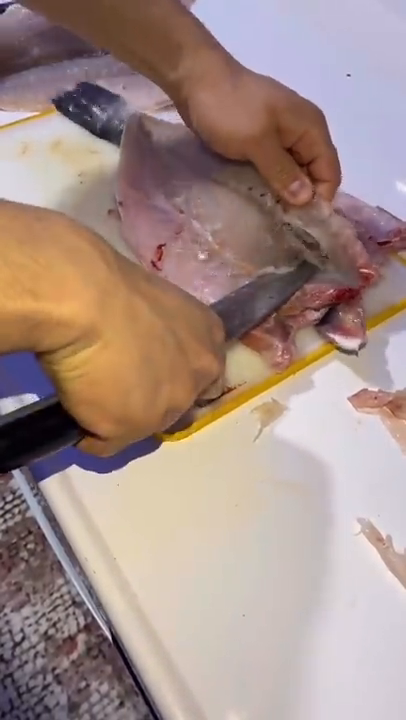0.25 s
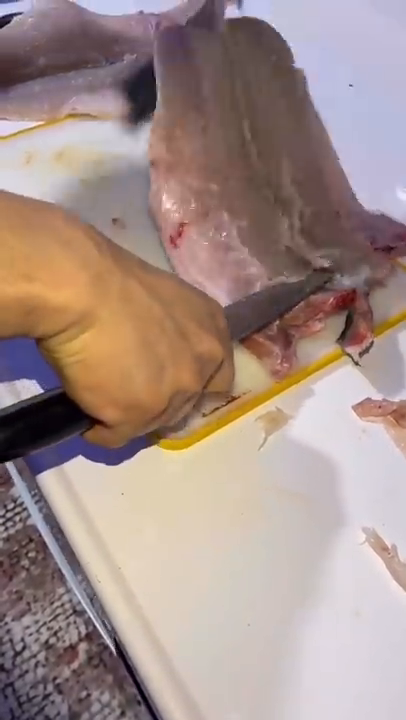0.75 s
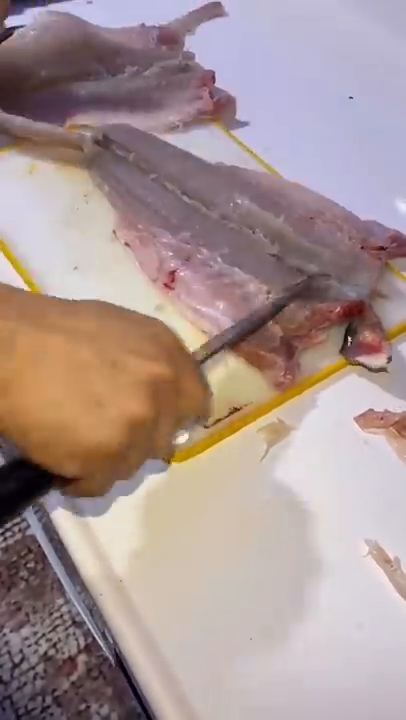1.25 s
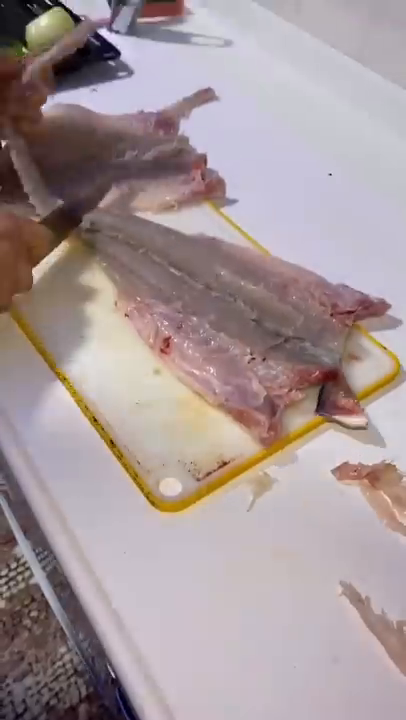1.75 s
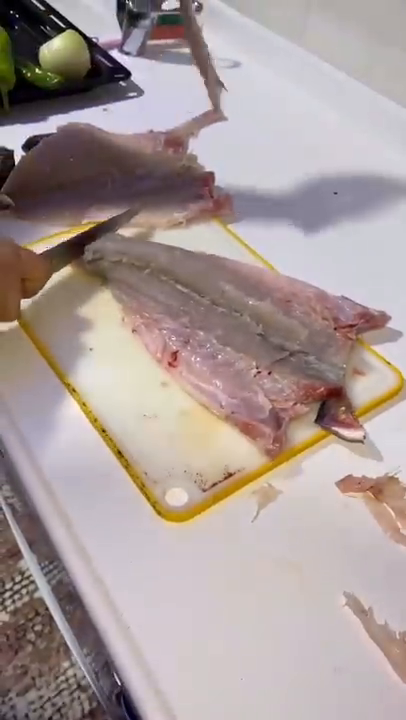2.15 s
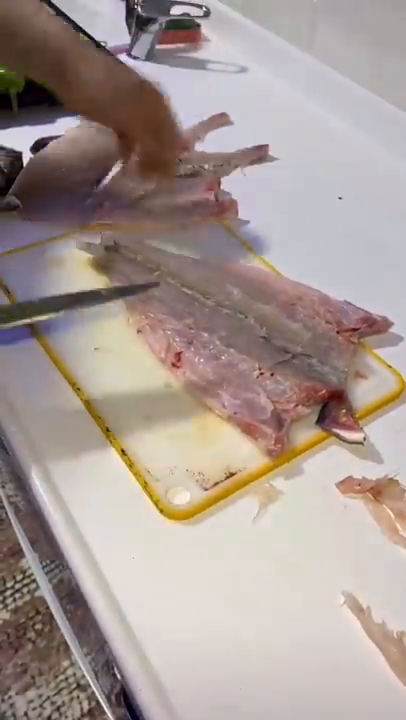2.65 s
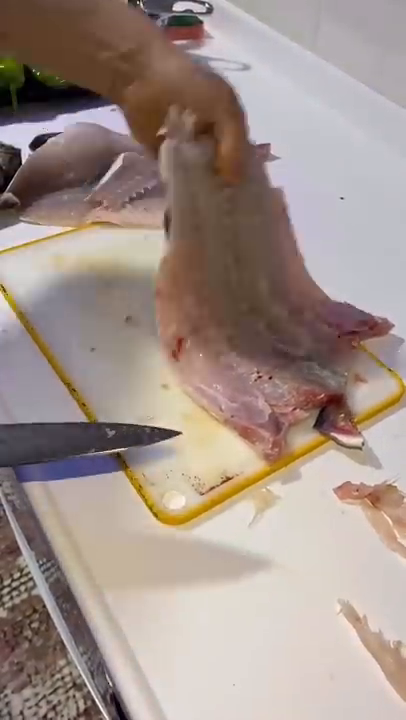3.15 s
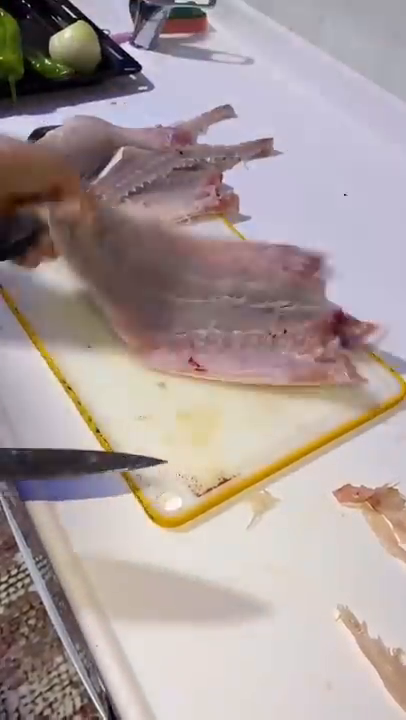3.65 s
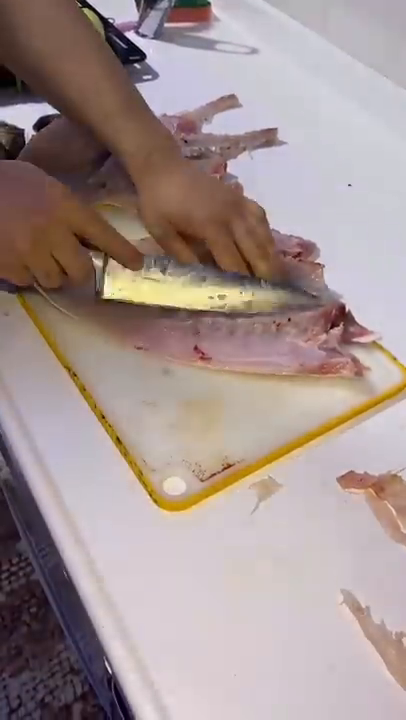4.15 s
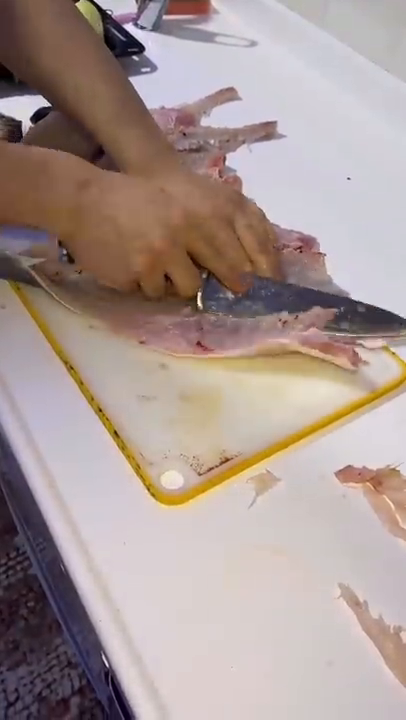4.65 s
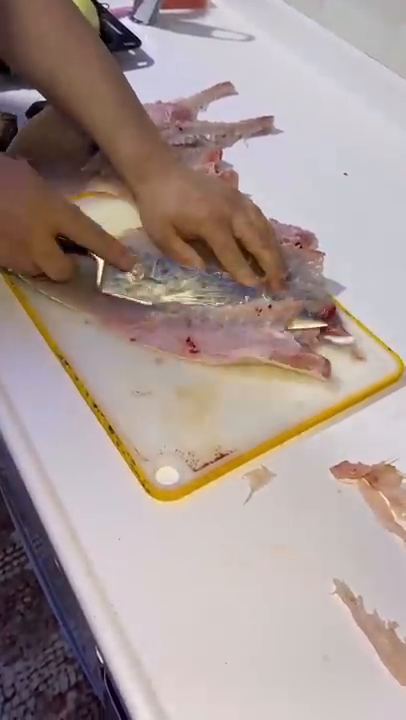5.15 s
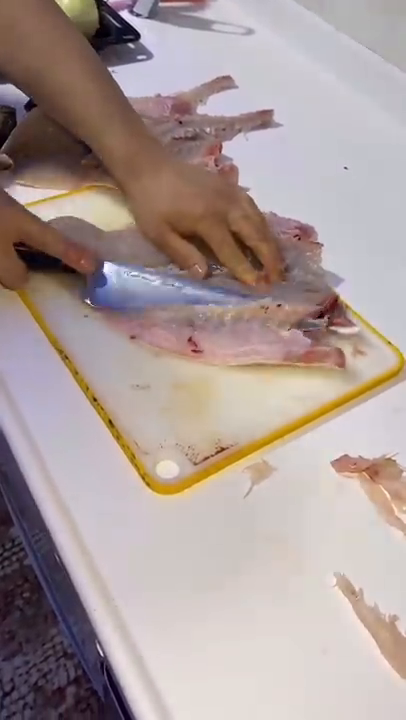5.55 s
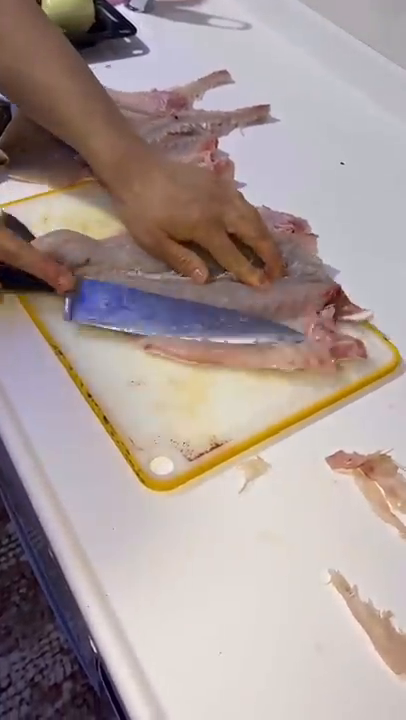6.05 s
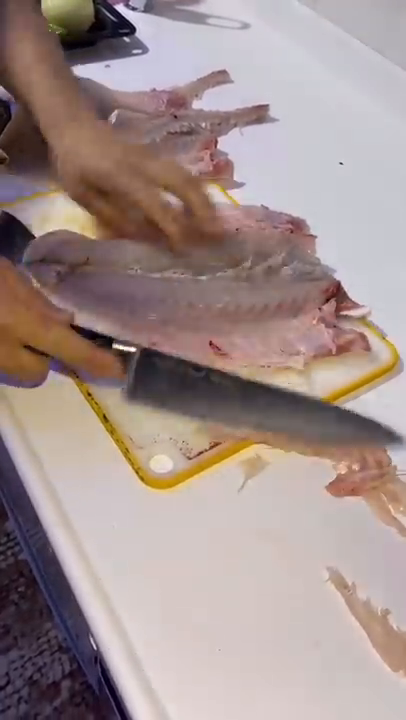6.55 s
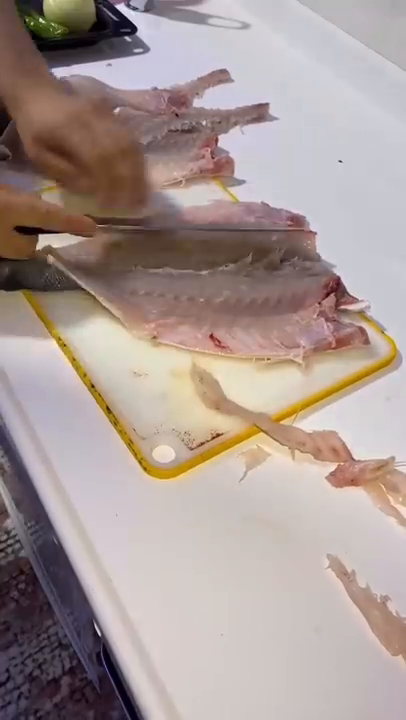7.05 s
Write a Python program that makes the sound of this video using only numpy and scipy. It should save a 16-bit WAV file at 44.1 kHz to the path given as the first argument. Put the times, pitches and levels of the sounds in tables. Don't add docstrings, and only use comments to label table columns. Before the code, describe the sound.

Close squelchy pulls, ticks and taps of a knife on a board, one loud thud, then quieter slicing strokes in a tiled kitchen.

```python
import sys
import numpy as np
from scipy import signal
from scipy.fft import rfft, irfft, next_fast_len
from scipy.io import wavfile
from scipy.ndimage import uniform_filter1d, map_coordinates

SR = 44100
rng = np.random.default_rng(int(sys.argv[2]) if len(sys.argv) > 2 else 0)


def magnitude_from_level(level_db):
    exponent = np.asarray(level_db, float) / 20
    return 10 ** exponent


def file_out(sig):
    cols = np.atleast_2d(sig).T
    lim = np.clip(cols, -1, 1)
    pcm = np.round(lim * 32767).astype(np.int16)
    wavfile.write(sys.argv[1], SR, pcm)


N = 322350
CUT_S = 3.588

# frequency in Hz, density in dB per Hz.
FIZZ = [(4000, -25), (6500, 1.5), (10000, 2.5), (15500, -2), (16200, -23.5)]


def along(points, hz):
    f, v = np.transpose(points)
    return np.interp(np.log(hz + 1), np.log(f + 1), v)


def unit(x):
    return x / np.sqrt(np.mean(x ** 2) + 1e-20)


def filtered(x, response):
    n = x.shape[-1]
    m = next_fast_len(n + 2048)
    return irfft(rfft(x, m) * response(np.fft.rfftfreq(m, 1 / SR)), m)[..., :n]


def resonance(f, hz, width_hz):
    return 1j * f * width_hz / (hz * hz - f * f + 1j * f * width_hz)


def noise(spectrum, size):
    return unit(filtered(rng.standard_normal(size), lambda f: magnitude_from_level(along(spectrum, f))))


def wobble(rate, size):
    marks = np.arange(0, size + 8, 8)
    knots = rng.standard_normal(int(size * rate / SR) + 4)
    curve = map_coordinates(knots, [marks * rate / SR])
    return np.interp(np.arange(size), marks, curve)


def patchy(x, depth_db):
    z = signal.stft(x, nperseg=256)[2]
    field = uniform_filter1d(rng.standard_normal(z.shape), size=9, axis=0)
    field = uniform_filter1d(field, size=5, axis=1)
    return unit(signal.istft(z * magnitude_from_level(depth_db * unit(field)), nperseg=256)[1][:N])


def add(track, s, sound):
    part = track[round(s * SR):][:len(sound)]
    part += sound[:len(part)]


def gate(table):
    out = np.zeros(N)
    for s, length in table:
        out[round(s * SR):round((s + length) * SR)] = 1
    return uniform_filter1d(out, size=128)


def room_tone(view):
    # frequency in Hz, density in dB per Hz.
    air = [
        [(15, -45), (32, -20), (55, 0), (75, -23.5), (112, -2), (161, -18.5), (222, -10), (359, -21),
         (447, -15.5), (800, -25.5), (1020, -31.5), (3000, -55), (3900, -87), (6600, -120)],
        [(15, -68), (25, -59), (59, -0.5), (129, -8.5), (140, -5.5), (161, -4.5), (288, -12), (325, -14),
         (485, -14), (655, -14.5), (997, -19), (3000, -42), (3900, -53), (6600, -120)],
    ]
    air_db = [-52, -54]
    # frequency in Hz, level in dB.
    fridge = [
        [(48, -65), (110, -63), (220, -64.5), (334, -75), (440, -70.5)],
        [(160, -57.5), (223, -72.5), (320, -64), (382, -67), (640, -70)],
    ]
    t = np.arange(N) / SR
    rush = np.array([noise(air[view], size=N), noise(air[view], size=N)])
    rush = rush * magnitude_from_level(air_db[view] + 1.3 * wobble(2.8, size=N))
    hum = np.zeros(N)
    for hz, db in fridge[view]:
        level = magnitude_from_level(db + 3.0 + 3.4 * wobble(12, size=N))
        hum += level * np.sin(2 * np.pi * hz * t + 2.1 * wobble(11, size=N))
    return rush + hum


def effort():
    # peak time in s, peak level in dB, swell in s per
    # 20 dB, fade in s per 20 dB, fizz over rub in dB.
    rub_strokes = [(0, -50, .1, .16, 3), (.247, -37.5, .04, .16, -5), (.43, -45, .05, .15, -15),
                   (.529, -39, .3, .2, -1.5), (.9, -51, .9, .3, -3), (1.083, -51, .03, .3, -8),
                   (1.854, -44, .017, .3, -5), (1.375, -63, .04, .06, 1), (.615, -47, .05, .03, -8),
                   (1.96, -38, .17, .045, -8), (2.07, -55.5, .05, .09, -5), (2.23, -68, .2, .12, 6),
                   (2.54, -67, .04, .2, 3), (2.72, -56, .035, .6, -8), (2.924, -61, .3, .15, 10),
                   (3.064, -57, .2, .25, 9), (3.17, -64, .15, .25, 9), (3.625, -68, .02, .3, -5),
                   (4.11, -60, .4, .07, -4), (4.266, -52, .2, .09, -5), (4.615, -43, .16, .06, 1),
               (4.2, -58, .1, .1, -10), (4.7, -53, .1, .1, -10), (4.787, -51, .2, .3, -4),
               (4.9, -54, .1, .1, -10), (5.021, -57.5, .1, .35, -5), (5.13, -59, .12, .2, -6),
               (5.326, -51, .025, .16, 1), (5.462, -50.5, .1, .09, -5.5), (5.624, -42, .065, .04, -12),
               (5.73, -44, .07, .045, -12.5), (5.857, -46.5, .05, .07, -11), (5.987, -44, .05, .03, 3),
               (6.085, -46, .02, .11, -2), (6.219, -41, .03, .075, 1.5), (6.52, -64, .2, .16, -10),
               (6.6, -60, .08, .12, -12), (6.675, -51, .1, .06, -10), (6.73, -57, .1, .08, 3),
               (6.849, -57, .15, .17, 2.5), (7.207, -66, .9, .2, -2)]
    rest_db = -94
    t = np.arange(0, N + 16, 16) / SR
    rub, fizz = np.full(len(t), magnitude_from_level(rest_db)), np.full(len(t), magnitude_from_level(rest_db))
    for s, db, swell_s, fade_s, fizz_db in rub_strokes:
        gain = magnitude_from_level(db - 20 * np.maximum((s - t) / swell_s, (t - s) / fade_s))
        rub, fizz = np.hypot(rub, gain), np.hypot(fizz, gain * magnitude_from_level(fizz_db))
    return [np.interp(np.arange(N) / SR, t, gain) for gain in (rub, fizz)]


def rubbing():
    # frequency in Hz, density in dB per Hz.
    scrape = [(700, -17), (2100, -1), (3300, -3), (7500, -9)]
    sing_hz, sing_db = 2000, -38
    slide_s, slide_hz, slide_db = 6.85, 3350, -73
    t = np.arange(N) / SR
    rub, fizz = effort()
    sing = unit(filtered(rng.standard_normal(N), lambda f: resonance(f, sing_hz, 300) ** 2)) * (t > CUT_S)
    slide = unit(filtered(rng.standard_normal(N), lambda f: resonance(f, slide_hz, 400) ** 2))
    slide = slide * (t > slide_s)
    pops = np.clip(wobble(400, size=N) - 1.6, 0, None)
    grain = 1.6 * wobble(35, size=N) + 1.3 * wobble(300, size=N) + 5 * pops
    low = rub * magnitude_from_level(grain) * patchy(noise(scrape, size=N), depth_db=3.5)
    high = fizz * magnitude_from_level(grain) * patchy(noise(FIZZ, size=N), depth_db=4.0)
    singing = rub ** 2 / magnitude_from_level(sing_db) * sing
    return magnitude_from_level(-5.0) * (magnitude_from_level(slide_db + grain) * slide + low + high + singing)


def aside():
    # start in s, peak level in dB.
    side_snaps = [(0.0353, -43.5), (0.0932, -49), (0.1221, -51), (0.2124, -56), (0.2463, -40),
                  (0.2902, -47.5), (0.3262, -50), (0.3995, -51.5), (0.4234, -51.5), (0.4633, -51),
                  (0.4798, -42), (0.5746, -48.5), (1.0804, -51.5), (1.6561, -38), (1.8507, -44),
                  (1.8986, -37.5), (2.0542, -43.5), (2.5242, -63.5), (4.0281, -60), (4.4835, -57.5),
                  (4.5434, -53), (4.5823, -36.5), (4.7779, -52.5), (5.6135, -54), (5.8584, -40),
                  (5.9787, -52), (6.0869, -49), (6.2061, -50), (6.8547, -50.5), (6.8946, -57.5)]
    out, t = np.zeros(N), np.arange(2048) / SR
    for s, db in side_snaps:
        snap = noise([(6000, -28), (8500, 11.5), (15800, -1)], size=len(t))
        add(out, s, magnitude_from_level(db - 3.5 - 60 * t / 0.024) * snap)
    return out


def bursts(table, fizz_db, knock_db, cavity_db):
    # frequency in Hz, width in Hz, level in dB.
    board_modes = [(377, 590, -5), (850, 250, 9.5), (1404, 460, 0)]
    # frequency in Hz, density in dB per Hz.
    crack_spectrum = [(900, -7.5), (1600, 1), (3000, -7.5), (6000, -3.5), (8000, -25.5)]
    out, t = np.zeros(N), np.arange(3072) / SR

    def board(f):
        return sum((-1) ** k * magnitude_from_level(db) * resonance(f, hz, w) for k, (hz, w, db) in enumerate(board_modes))

    for s, db, t60, hz in table:
        rise = .045 * t60
        smooth = magnitude_from_level(-60 * t / t60) * (1 - np.exp(-t / rise)) ** 2
        ragged = unit(smooth * magnitude_from_level(3.5 * wobble(600, size=len(t))))
        shape = ragged * np.sqrt(np.mean(smooth ** 2))
        colour = rng.standard_normal(12)
        tint = lambda f: magnitude_from_level(2.8 * np.interp(f, np.linspace(1000, 16000, num=len(colour)), colour))
        crack = noise(crack_spectrum, size=len(t))
        fizz = magnitude_from_level(fizz_db) * noise(FIZZ, size=len(t))
        tone = lambda f: magnitude_from_level(cavity_db) * resonance(f, hz, .2 * hz) + 4.9 * magnitude_from_level(knock_db) * board(f)
        ring = filtered(rng.standard_normal(len(t)) * shape, tone)
        add(out, s - rise, magnitude_from_level(db + 4.5) * (filtered(crack + fizz, tint) * shape + ring))
    return out


def contacts():
    # start in s, crack level in dB, t60 in s, cavity frequency in Hz.
    snaps = [(.036, -46, .02, 6000), (.052, -53, .015, 5500), (.475, -44, .012, 6500),
             (.497, -45, .012, 6500), (.1233, -42, .034, 6350), (.3467, -47, .031, 6500),
             (.3985, -37, .018, 6000), (.8429, -54, .041, 730), (1.8503, -31, .018, 6000),
             (1.907, -35, .045, 5840), (2.0545, -40, .028, 1500), (2.912, -53, .06, 690),
             (3.0357, -57, .06, 6420), (3.6277, -35, .11, 4100), (4.0622, -58, .03, 800),
             (4.484, -45.5, .016, 3830), (4.561, -50, .029, 600), (4.696, -52, .019, 600),
             (5.0055, -49.5, .058, 6290), (5.0146, -50, .041, 4590), (5.2552, -61, .02, 650),
             (5.5476, -57, .014, 5300), (5.8487, -45, .067, 2350), (5.8597, -35, .021, 1960),
             (5.9585, -51, .1, 2090), (6.8557, -57, .013, 1500), (2.858, -56, .03, 6500),
             (3.275, -60, .03, 6400), (3.31, -59, .03, 6000), (6.728, -58, .02, 3200)]
    taps = [(.0943, -34, .016, 930), (.2341, -36, .021, 930), (.4243, -27.5, .02, 2800),
            (.4654, -39, .031, 5230), (.482, -30, .026, 820), (.5158, -35, .015, 3770),
            (.6612, -48, .033, 930), (1.96, -33, .025, 1810), (2.2457, -61, .051, 2890),
            (2.8714, -55, .04, 2930), (2.7136, -50, .02, 1000), (3.7136, -54, .043, 1900),
            (4.4597, -54, .038, 670), (4.8978, -53, .046, 600), (5.3132, -52, .068, 600),
            (5.6235, -38, .024, 2000), (6.2225, -39, .08, 4020), (6.496, -57, .024, 5500),
            (7.2031, -58, .056, 5500)]
    knocks = [(.1395, -44, .059, 1600), (.2121, -47, .05, 710), (.2466, -38, .017, 4050),
              (.2529, -41, .04, 1600), (.529, -38, .07, 900), (.62, -47, .05, 900), (.79, -49, .05, 1000),
              (1.02, -56, .03, 1900), (.582, -45, .033, 970), (.7622, -47, .045, 800),
              (1.918, -38, .021, 3000), (2.7754, -51, .074, 1210), (4.5432, -62, .068, 1270),
              (5.5834, -54, .033, 620), (5.998, -46.5, .06, 2380), (6.5136, -58, .036, 1250),
              (6.5887, -60, .06, 1450), (6.668, -59, .069, 1890)]
    ticks = [(.0722, -52, .026, 710), (.109, -50, .03, 3040), (.2943, -38, .035, 1600),
             (.3277, -38.5, .031, 860), (.8562, -47, .02, 5510), (.925, -49, .03, 750),
             (1.073, -46, .03, 5500), (1.6447, -50, .06, 4010), (1.6549, -23, .062, 1000),
             (3.6209, -38, .09, 350), (4.5845, -45, .025, 600), (4.6083, -44, .03, 670),
             (4.7782, -37, .016, 2600), (5.1606, -51, .017, 4160), (5.615, -41, .025, 2020),
             (5.978, -37, .018, 2580), (6.081, -32, .022, 2600), (6.0894, -31, .015, 2800),
             (6.2074, -39, .029, 4760)]
    chop = [
        (1.0814, -14.5, .03, 1600),
    ]
    flop = [
        (2.54, -26, .065, 2600),
        (2.531, -59, .03, 5000),
    ]
    slaps = [
        (1.6692, -14, .045, 840),
    ]
    out = bursts(snaps, fizz_db=8, knock_db=-13, cavity_db=15)
    out += bursts(taps, fizz_db=3, knock_db=-6, cavity_db=15)
    out += bursts(knocks, fizz_db=-9, knock_db=2, cavity_db=21)
    out += bursts(ticks, fizz_db=-5, knock_db=-23, cavity_db=15)
    out += bursts(chop, fizz_db=-1, knock_db=-17, cavity_db=2)
    out += bursts(flop, fizz_db=-4, knock_db=-8, cavity_db=9)
    out += bursts(slaps, fizz_db=-10, knock_db=2, cavity_db=14)
    return out


def blade(table, blur):
    out, t = np.zeros(N), np.arange(SR // 4) / SR
    shake = blur * wobble(350, size=N + len(t))
    for s, hz, db, t60 in table:
        phase = 2 * np.pi * hz * t + shake[round(s * SR):][:len(t)]
        add(out, s, magnitude_from_level(db - 60 * t / t60) * (1 - np.exp(-t / 0.0012)) * np.sin(phase))
    return out


def thumps():
    # start in s, peak level in dB, pitch in Hz, t60 in s.
    landings = [(0.231, -34, 110, 0.13), (.26, -36.5, 70, .2), (0.503, -32, 65.6, .2),
                (.55, -37.5, 90.9, .25), (1.083, -29, 190, 0.15), (1.957, -30, 108.6, 0.16),
                (2.545, -26, 135, 0.14), (3.63, -33, 125, 0.17), (4.57, -40, 220.7, 0.35),
                (4.819, -43, 119, 0.18), (5.489, -43.5, 87, .3), (5.605, -39.5, 89.3, 0.39),
                (5.74, -39.5, 75.4, 0.2), (5.986, -42, 160, .08), (4.58, -42, 480, .15),
                (2.55, -35, 55, .25), (6.24, -39, 55, .2), (5.985, -29, 74, 0.14),
                (6.219, -30.5, 115, 0.14), (6.516, -36, 102, 0.19), (6.827, -38.5, 89, 0.067),
                (6.909, -40.5, 144, 0.1)]
    out, t = np.zeros(N), np.arange(SR // 3) / SR
    for s, db, hz, t60 in landings:
        tone = np.sin(2 * np.pi * hz * t + 0.77 * wobble(20, size=len(t)))
        rumble = noise([(hz / 3, -30), (hz, 0), (hz * 4, -9), (hz * 9, -35)], size=len(t))
        envelope = magnitude_from_level(db - 60 * t / t60) * (1 - np.exp(-t * hz / 0.57))
        add(out, s, envelope * (tone + 0.65 * rumble))
    return out


def ringing():
    drop_s = 1.669
    # frequency in Hz, density in dB per Hz.
    thud = [(55, -27.5), (100, -4.5), (330, 1), (600, -4), (1200, -10.5), (2000, -30.5)]
    # frequency in Hz, level in dB, t60 in s.
    counter = [(85.4, -8.5, 0.16), (135.9, -10, 0.34), (331.7, -14, 0.36), (548, -25, 0.083),
               (800, -20, .2), (940, -21, 0.22), (1207, -21, .15)]
    out, t = np.zeros(N), np.arange(SR // 2) / SR
    envelope = magnitude_from_level(-13.5 - 60 * t / 0.27) * (1 - np.exp(-t / 0.009))
    add(out, drop_s, envelope * noise(thud, size=len(t)))
    for hz, db, t60 in counter:
        rattle = 1.2 * wobble(40, size=len(t))
        rough = .7 * wobble(45, size=len(t))
        envelope = magnitude_from_level(db + rattle - 60 * t / t60) * (1 - np.exp(-t * hz / 0.73))
        add(out, drop_s, envelope * np.sin(2 * np.pi * hz * t + rough))
    return out


def kitchen(x):
    # frequency in Hz, t60 in s.
    decay = [(100, 0.68), (1000, 0.34), (4000, 0.23), (14000, 0.15)]
    out, step = np.zeros((2, N + 2 * SR)), SR // 3
    for start in range(0, N, step):
        hz, t, z = signal.stft(rng.standard_normal((2, SR // 2)), SR, nperseg=256)
        tail = signal.istft(z * magnitude_from_level(-60 * t / along(decay, hz)[:, None]), SR, nperseg=256)[1]
        wet = signal.fftconvolve(x[None, start:start + step], tail / np.linalg.norm(tail[0]), axes=1)
        out[:, start + 130:][:, :wet.shape[1]] += wet
    return out[:, :N]


def ports(direct, diffuse, view):
    # frequency in Hz, difference over sum in dB.
    balance = [
        [(60, -36), (200, -19), (700, -7), (2400, -3), (4400, 0), (7700, 3), (9000, 30), (13500, 30),
         (14000, 6), (15000, 1), (16000, 2)],
        [(60, -37), (200, -22), (1300, -4), (2900, -12), (4400, -1), (8000, 0), (11000, 4), (12000, 30),
         (16000, 30)],
    ]
    # frequency in Hz, phase in radians.
    turn_phase = [(100, .5), (400, -.6), (800, -1.3), (1700, -1.7), (2200, -4.6), (6000, -4.7)]
    # start in s, length in s.
    stray = [(0, .02), (.033, .008), (.092, .012), (.12, .008), (.205, .075), (.324, .049), (.397, .007),
             (.422, .01), (.454, .054), (.575, .063), (.72, .022), (1.045, .028), (1.665, .029),
             (1.847, .013), (1.894, .028), (2.05, .02), (2.14, .12), (2.291, .033), (2.445, .031),
             (2.521, .009), (2.85, .02), (2.9, .024), (3.27, .028), (3.416, .019), (1.956, .012),
             (4.017, .018), (4.175, .029), (4.355, .034), (4.481, .012), (4.525, .024), (4.568, .035),
             (4.776, .032), (4.983, .035), (5.098, .035), (5.145, .03), (5.242, .02), (5.29, .043),
             (5.409, .025), (5.857, .018), (5.89, .039), (5.969, .014), (6.404, .05), (6.495, .03),
             (6.582, .013), (6.851, .012), (6.891, .011), (6.945, .023), (7.13, .094)]
    # start in s, length in s.
    hushed = [
        (1.49, .15),
        (1.77, .06),
        (2.36, .08),
        (2.6, .09),
        (3.42, .17),
    ]

    def lean(f):
        return np.arctan(magnitude_from_level(along(balance[view], f)))

    def bands(f):
        return np.cos(lean(f)) * np.array([f < 13300, (f >= 13300) & (f < 14900), f >= 14900])

    def leak(bias):
        return np.clip(3 * (wobble(16, size=N) + bias), 0, 1) * (1 - gate(hushed))

    body, edge, top = filtered(direct + diffuse[0], bands)
    mid = body + leak(.7) * edge + leak(1.5) * top
    mid += gate(stray) * magnitude_from_level(-14) * filtered(direct, lambda f: np.sin(lean(f)) ** 4)
    side = filtered(direct, lambda f: np.sin(lean(f)) * np.exp(1j * along(turn_phase, f)))
    side += filtered(diffuse[1], lambda f: np.sin(lean(f)))
    return np.array([mid + side, mid - side])


def scene():
    # start in s, frequency in Hz, level in dB, t60 in s.
    clear_tones = [(1.2705, 756, -23.5, 0.017), (1.277, 5200, -60, .14), (1.273, 6400, -62, .05),
                   (1.273, 3000, -62, .06), (1.669, 2850, -6, 0.024), (1.69, 8000, -52, .5),
                   (2.247, 2900, -52, 0.096), (2.248, 1497, -55, 0.16), (2.777, 2063, -40, 0.069),
                   (2.775, 3130, -49, .05), (2.995, 3440, -49.5, .04), (4.815, 900, -41, 0.05),
                   (1.99, 4050, -50, .1), (1.719, 345, -14, .05), (.253, 1600, -36, .04),
                   (.245, 4050, -38, .03), (.424, 3000, -30, .02), (.094, 860, -28, .03),
                   (.482, 820, -26, .035), (.233, 830, -31, .03), (.399, 900, -37, .015),
                   (.531, 900, -31, .03), (5.623, 2000, -40, .04), (5.86, 2000, -39, .03),
                   (5.86, 8400, -42, .02), (5.975, 2450, -42, .04), (5.998, 2600, -44, .04),
                   (5.998, 7000, -50, .03), (5.72, 3800, -54, .12), (6.21, 6000, -44, .03),
                   (.143, 1640, -31, .03), (.144, 3000, -38, .02), (.254, 824, -27, .03),
                   (.255, 4000, -35, .025), (.293, 1640, -35, .03), (.292, 850, -37, .03),
                   (.4245, 2400, -29, .02), (.441, 2100, -38, .03), (.464, 5200, -37, .025),
                   (.515, 4830, -34, .02), (.514, 2200, -37, .02), (.394, 2300, -40, .02),
                   (1.674, 320, -7, .07), (.584, 918, -38, .03), (6.588, 1500, -50, .05),
                   (6.675, 1800, -50, .04), (4.553, 1270, -48, .04), (6.225, 700, -38, .06),
                   (2.778, 1150, -39, .07), (6.515, 1300, -50, .04)]
    struck = [(1.0818, 1669, -5, .017), (1.0818, 1394, -12, .028), (1.0812, 5800, -17, .01),
              (1.0812, 4786, -24, .015), (1.083, 851, -26, .04), (1.654, 850, -23, .05),
              (1.656, 300, -26, .06), (4.778, 4000, -33, .015), (4.778, 6000, -39, .012),
              (1.084, 330, -28, .12), (.253, 2600, -36, .03), (.295, 2700, -39, .03),
              (1.0815, 3000, -19, .014), (1.669, 900, -12, .035), (1.669, 1300, -9, .028),
              (1.682, 950, -14, .05), (1.657, 1300, -21, .04), (1.9595, 1055, -26, .035),
              (1.9595, 1760, -25, .028), (1.961, 4020, -30, .025), (1.959, 5900, -31, .015),
              (1.948, 2890, -37, .06), (1.954, 2890, -32, .03), (1.906, 6067, -30, .022),
              (1.908, 4100, -33, .02), (2.539, 4940, -25, .012), (2.539, 7000, -28, .01),
              (2.543, 1950, -25, .016), (2.542, 2700, -28, .016), (2.548, 511, -25, .05),
              (2.056, 1100, -39, .03), (3.634, 620, -34, .05), (3.64, 240, -35, .08)]
    work = rubbing() + contacts() + thumps() + ringing()
    echo = magnitude_from_level(-8.5) * kitchen(work + magnitude_from_level(-4) * blade(struck, blur=1.3))
    direct = work + blade(struck, blur=0) + blade(clear_tones, blur=0)
    after = np.clip((np.arange(N) / SR - CUT_S) / 0.0057, 0, 1)
    views = [ports(direct, echo + room_tone(view), view) for view in (0, 1)]
    return (1 - after) * views[0] + after * views[1] + aside()


def low_pass(x):
    return signal.sosfilt(signal.butter(12, 17160, fs=SR, output="sos"), x)


def record(dry):
    x = filtered(dry, lambda f: magnitude_from_level(-55 * np.clip((f - 15750) / 450, 0, 1)))
    mix = x / (1 + np.abs(x / .98) ** 6) ** (1 / 6)
    return low_pass(mix)


dry = scene()
out = record(dry)
file_out(out)
```